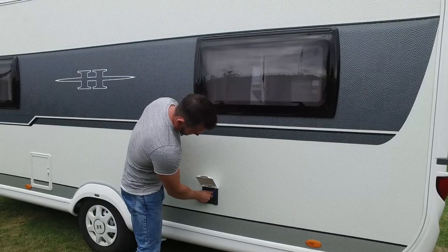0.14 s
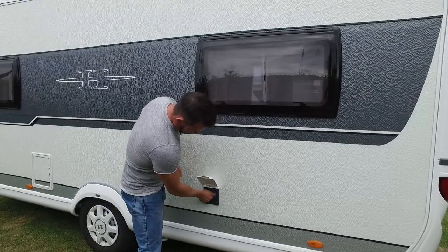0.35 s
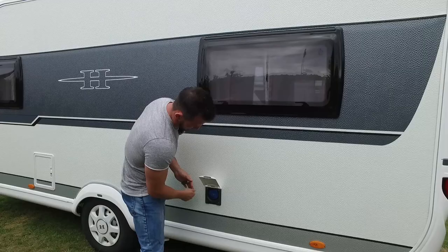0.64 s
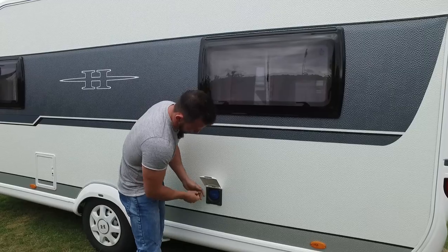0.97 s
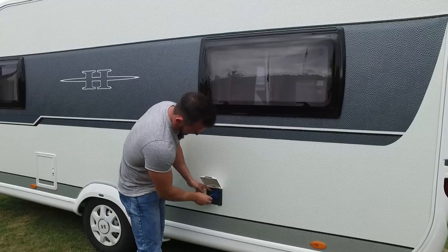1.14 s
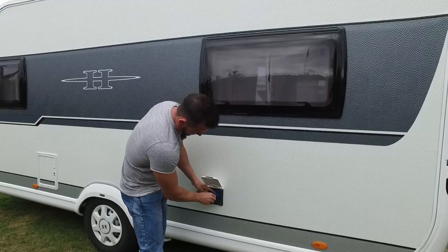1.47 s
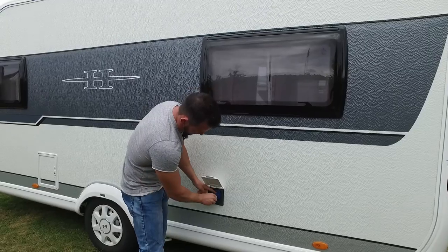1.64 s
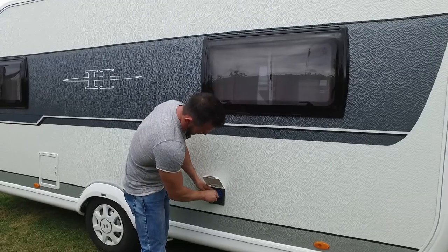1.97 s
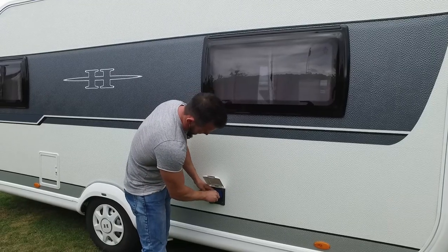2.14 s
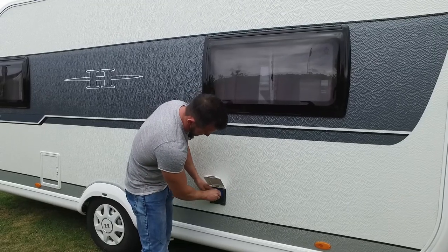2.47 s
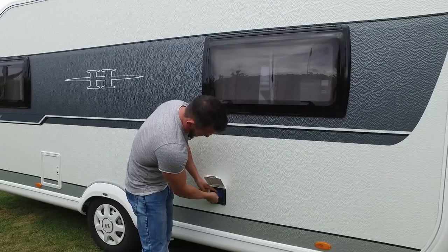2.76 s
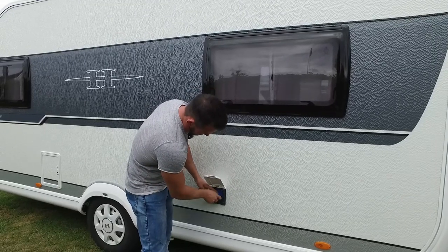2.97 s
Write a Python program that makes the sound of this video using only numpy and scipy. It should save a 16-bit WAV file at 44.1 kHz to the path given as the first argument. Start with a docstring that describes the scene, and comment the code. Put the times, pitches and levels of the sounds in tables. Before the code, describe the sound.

A plastic filler cap clicks and knocks in a hollow caravan wall. A key scrapes out of its lock first, then the cap rubs, turns and snaps into place. Faint air rumbles outdoors underneath.

```python
"""A plastic filler cap in a caravan wall is gripped, turned and seated, outdoors on quiet grass.
Each contact clicks in the plastic and thumps the hollow wall; the cap rubs and its catch snaps home.
Short, gritty scrapes come first from the key leaving the lock, later from the cap as it turns and seats.
The key squeaks once and its ring ticks now and then. The wall flexes under the hand,
light air rumbles underneath, and a faint far tone enters at the end."""
import sys
import numpy as np
from scipy import signal
from scipy.fft import rfft, irfft
from scipy.io import wavfile

SR = 44100
rng = np.random.default_rng(int(sys.argv[2]) if len(sys.argv) > 2 else 0)


def to_wav(sig):
    """Store sig (one row per channel, or 1-D mono) as 16-bit WAV at the path in sys.argv[1].

    Samples outside -1..1 are clipped; the rate is SR.
    """
    pcm = np.clip(np.atleast_2d(sig), -1, 1) * 32767
    pcm = np.round(pcm).astype(np.int16)
    wavfile.write(sys.argv[1], SR, pcm.T)  # frames by channels


N = 136710

# modes (natural tones) of wall, housing and cap: f/Hz, relative level/dB, t60/s (time to fade by 60 dB)
CAP_MODES = [(155.5, -15, 0.025), (199.2, 2.5, 0.0297), (244.2, 4.5, 0.069), (293.2, 5, 0.042),
             (352.4, 8, 0.028), (460.7, -7.5, 0.083), (550, -6.5, 0.12), (687, -7, 0.069),
             (937, -13.5, 0.038), (1100, 4, 0.014), (1326, -4.5, 0.03), (1560, -41, 0.0018),
             (2262, -9, .024), (2446, -0.5, 0.0071), (3280, 4, 0.0038), (3540, 1.5, 0.0033),
             (3720, -17.5, 0.0023), (4500, -10, 0.0052), (5050, -26, 0.0042), (6750, 0, 0.0051),
             (7530, 5, 0.0013), (9000, 12.5, 0.0015), (10430, 7.5, 0.0015), (12700, 2, 0.0016)]
# centres of five pitch ranges, called thump, knock, clack, click and tick: f/Hz
RANGES_HZ = [220, 480, 1350, 4000, 10000]


def cap_contacts():
    """The cap bumps its housing, and each bump sets the modes ringing in a different balance."""
    # t/s, then relative level/dB of thump, knock, clack, click and tick
    contacts = [ (0.105, -50, -42, -51, -46, -69), (0.219, -37, -28, -68, -54, -67),
                (0.316, -30.5, -44, -63, -61, -60), (0.347, -30, -22, -41.5, -44, -50),
                (0.5517, -30, -22, -36.5, -44.5, -55), (0.598, -28.5, -56, -45.5, -56.5, -65),
                (0.614, -65, -24, -45, -53, -62), (0.6327, -24.5, -6, -22.5, -18, -50.5),
                (0.825, -90, -46, -52.5, -99, -64), (1.3792, -38, -22, -30, -31.5, -47.5),
                (1.446, -39.5, -44.5, -85, -65, -66), (1.4536, -33.5, -90, -31.5, -69, -72),
                (1.464, -44, -35, -40, -48, -60), (1.541, -38.5, -71, -41.5, -69, -70.5),
                (1.563, -36, -26, -41.5, -63, -68.5), (1.617, -23.5, -22.5, -35, -32.5, -55.5),
                (1.874, -36, -58, -51.5, -57.5, -69), (1.881, -45.5, -33, -45, -70, -83),
                (1.943, -57, -64, -51, -68, -83), (2.017, -69, -66, -57, -50, -68.5),
                (2.087, -26.5, -49, -51, -59, -54), (2.098, -29, -69, -40.5, -34, -61.5),
                (2.1028, -28.5, -42, -26, -41.5, -58), (2.122, -28.5, -41, -32.5, -58, -79),
                (2.217, -46, -51.5, -47, -55, -72), (2.3387, -21.5, -26.5, -31.5, -28, -46.5),
                (2.350, -38.5, -17.5, -30, -39, -50), (2.369, -27, -57, -31.5, -59, -59),
                (2.418, -28.5, -35.5, -28, -56, -48.5), (2.437, -45.5, -26, -54, -44, -76),
                (2.444, -27.5, -45, -36.5, -45.5, -59), (2.5378, -17, -26, -25.5, -47, -35.5),
                (2.571, -28, -57, -31, -66, -48), (2.5879, -14, -52, -31, -26.5, -42),
                (2.746, -32.5, -68, -51, -54.5, -65), (2.7723, -38, -35.5, -38, -61, -75),
                (2.777, -43, -82, -39.5, -52, -67), (2.7959, -34.5, -28, -31, -55, -78),
                (2.814, -57, -15.5, -39, -75, -52), (2.818, -36, -29.5, -27.5, -63, -63.5),
                (3.061, -52.5, -32, -47.5, -45, -66)]
    out = np.zeros(N)
    for start, *levels in contacts:
        add(out, start, strike(CAP_MODES, mode_levels(levels) - 0.5))
    return out


def mode_levels(range_db):
    """Spreads five levels, one for each pitch range, smoothly over the cap's modes."""
    hz = np.array(CAP_MODES)[:, :1]
    return np.interp(np.log(hz), np.log(RANGES_HZ), range_db)


def strike(modes, gain_db):
    """One contact: low modes ring from a single push, high ones from a crunch of tiny slips after it."""
    t = np.arange(SR // 8) / SR
    hz, db, t60 = np.transpose(modes)[:, :, None]
    high = hz[:, 0] > 1900
    t60 = np.minimum(t60, 0.032 * np.sqrt(1000 / hz))  # the hand cuts long rings short
    level_luck, pitch_luck = rng.standard_normal((2, len(hz), 1))
    detune = np.where(high, 0.05, 0.012)[:, None] * pitch_luck  # high modes vary most with the spot hit
    rings = from_db(db + gain_db + 1.5 * level_luck) * ring(hz * (1 + detune), t60, t)
    lag_s, fade_s = 0.00027, 0.0012
    late = np.maximum(t - lag_s, 0)
    crunch = slips(per_s=12000, size=len(t)) * late * np.exp(-late / fade_s)
    crunch = from_db(-1) * rms_one(crunch) / np.sqrt(len(t))
    click = signal.fftconvolve(rings[high].sum(axis=0), crunch)[:len(t)]
    return rings[~high].sum(axis=0) + click


def ring(hz, t60, t):
    """A mode is pushed inwards, builds up within a cycle and dies away."""
    rise = 1 - np.exp(-(t * hz / 0.47) ** 2)
    return -rise * np.exp(-np.log(1000) * t / t60) * np.sin(2 * np.pi * hz * t)


def contact_notes():
    """Some bumps and the catch's snap also ring briefly at pitches of their own."""
    # t/s, f/Hz, level/dB, t60/s
    notes = [(0.2034, 1020, -22.5, 0.013), (0.3485, 579, -25.5, 0.073), (0.553, 764, -25.5, 0.028),
             (0.6335, 385, -14, 0.025), (0.6357, 1117, -13, 0.015), (1.3798, 2360, -26, 0.0092),
             (1.3796, 1550, -33.5, 0.029), (1.38, 480, -33.5, 0.026), (1.62, 3140, -30.5, 0.0058),
             (2.594, 2114, -44, .11), (2.818, 518, -31, 0.087)]
    out, t = np.zeros(N), np.arange(SR // 8) / SR
    for start, hz, db, t60 in notes:
        add(out, start, from_db(db) * ring(hz, t60, t))
    return out


def cap_rub():
    """The turning cap sticks and slips in its seat, shaking its modes into a dull, gritty sound."""
    # t/s, length/s, level/dB
    rubs = [(1.43, 0.031, -54), (1.534, 0.043, -54), (2.084, 0.052, -44.5), (2.407, 0.038, -46.5),
            (2.718, 0.14, -49.5)]
    # one value for each pitch range: relative level/dB
    balance = [-4.5, -3, -4, -17, -30]
    pressure = sum(from_db(db) * envelope(start, length, attack_s=0.0037, release_s=0.0027)
                   for start, length, db in rubs)
    body = strike(CAP_MODES, mode_levels(balance))
    friction = pressure * rms_one(slips(per_s=2500, size=N))
    return signal.fftconvolve(friction, body / np.linalg.norm(body))[:N]


def cap_catch():
    """The cap's springy catch snaps home, hard and bright, and rattles."""
    # t/s, relative level/dB
    snaps = [(2.5407, -28.5), (2.5933, -20), (2.614, -64)]
    # modes of the catch: f/Hz, relative level/dB, t60/s before the hand damps them
    catch_modes = [(962, -15.5, 0.02), (1133, -5.5, 0.035), (1370, 5.5, 0.018), (1590, -7.5, 0.061),
                   (2290, -3.5, 0.0047), (3680, 1.5, 0.0057), (4020, -3.5, 0.0059), (4700, -0.5, 0.0058),
                   (5400, -14, 0.0092), (8560, -8, 0.00307), (9400, -12, 0.0051)]
    out = np.zeros(N)
    for start, db in snaps:
        add(out, start, strike(catch_modes, db))
    return out


def scrapes():
    """Tiny slips make gritty, ringing scrapes: the key leaves the lock, later the cap turns and seats."""
    # t/s, length/s, level/dB, treble boost/dB, pitch factor
    strokes = [(0.06, 0.0074, -52.5, -29, 0.97), (0.079, 0.0093, -49, -27, 0.88),
               (0.092, 0.0034, -45, 0.5, 0.99), (0.194, 0.015, -43, 7.5, 0.91),
               (0.2105, 0.0048, -43, 6, 1.2), (0.217, 0.16, -66.5, 7, 1), (0.25, 0.0049, -49.5, 6, 0.75),
               (0.2537, 0.0034, -32, -10, 1.06), (0.3003, 0.0065, -36, 6.5, 1.155),
               (0.307, 0.0063, -49, 16.5, 1.01), (0.3253, 0.0033, -44, -7, 1.1),
               (0.3413, 0.0087, -34.5, -5, 1.002), (0.38, 0.016, -74.5, 25, 0.95),
               (2.085, 0.0217, -77, 20.5, 1.13), (2.339, 0.0078, -47, -1.5, 1.24),
               (2.347, 0.022, -57, -11, 0.71), (2.413, 0.0076, -51.5, -14, 0.8),
               (2.537, 0.038, -54.5, -2, 1.04), (2.602, 0.031, -56, -13, 1.39),
               (2.811, 0.015, -52, -4, 0.9)]
    # resonances that the slips set ringing: base f/Hz, width/Hz, relative level/dB
    resonances = [(1030, 570, -4.5), (1604, 200, 4.5), (3070, 490, -4), (3790, 460, -1.5), (4000, 200, 2),
                  (4410, 170, -5.5), (5960, 350, -8), (7070, 850, -19.5), (9800, 4700, -21),
                  (11400, 780, -22), (12700, 1800, -30)]
    out, size = np.zeros(N), SR // 4
    lowpass = signal.butter(2, 7100, fs=SR, output="sos")
    for start, length, db, treble_db, pitch in strokes:
        grains = slips(per_s=10000, size=size)
        treble = grains - signal.sosfiltfilt(lowpass, grains)
        pressure = from_db(db) * envelope(0, length, attack_s=0.0002, release_s=0.0012)[:size]
        drive = pressure * (grains + (from_db(treble_db) - 1) * treble)
        # the plain grains ring too, only to set the scale; neighbouring resonances have opposite signs
        pair = np.array([drive, grains])
        sound, steady = sum((-1) ** k * from_db(mode_db) * resonate(pair, hz * pitch, width)
                            for k, (hz, width, mode_db) in enumerate(resonances))
        add(out, start, sound / steady.std())
    return out


def key_squeak():
    """On the way out, friction keeps a few narrow resonances of the key singing for a moment."""
    # f/Hz, width/Hz, relative level/dB
    resonances = [(606, 70, -6.5), (1010, 93, -13), (1530, 200, -4.5), (1960, 98, -11), (3000, 160, -10),
                  (3410, 200, -5), (3840, 60, -11), (4680, 110, -6.5), (5660, 150, -5), (11760, 110, -12.5)]
    friction = rng.standard_normal(N)
    song = sum(from_db(db) * rms_one(resonate(resonate(friction, hz, width), hz, 2 * width))
               for hz, width, db in resonances)
    return from_db(-42.5) * envelope(start=0.255, length=0.023, attack_s=0.003, release_s=0.004) * song


def key_ring():
    """The dangling key ring makes thin, bright ticks that do not shake the wall."""
    # t/s, relative level/dB
    ticks = [(0.758, -53), (1.738, -48), (2.207, -53), (2.334, -55), (2.372, -54), (2.852, -51),
             (2.8593, -42)]
    out, t = np.zeros(N), np.arange(SR // 20) / SR
    fade = np.exp(-t / 0.00025)
    for start, db in ticks:
        add(out, start, from_db(db + 5) * rng.standard_normal(len(t)) * fade)
    return butter(out, [2620, 12800], "band")


def wall_ring(sound):
    """The hollow wall rings on briefly after each sound, longest in the bass."""
    # strength of the ring: f/Hz, level/dB
    levels = [(80, -16.5), (230, -10), (500, -10.5), (1200, -14), (2200, -15), (3600, -23.5), (6000, -16),
              (12000, -11)]
    # length of the ring: f/Hz, t60/s
    fade_times = [(150, .18), (240, .15), (350, .11), (2000, .12), (5000, .1), (12000, .07)]
    t, response = np.arange(SR // 2) / SR, 0
    rise = np.minimum(t / 0.011, 1)
    borders_hz = np.geomspace(50, 16000, 15)
    for low, high in zip(borders_hz, borders_hz[1:]):
        hz = np.sqrt(low * high)
        fade = np.exp(-np.log(1000) * t / at_hz(fade_times, hz))
        band = butter(rng.standard_normal(len(t)) * rise * fade, [low, high], "band")
        band *= np.sqrt(2 * (high - low) / SR / np.sum(band ** 2))  # gain of about 1 inside the band
        response = response + band * from_db(at_hz(levels, hz))
    return signal.fftconvolve(sound, response)[:N]


def wall_flex():
    """The wall panel rumbles as the hand pushes and pulls it."""
    # t/s, length/s, level/dB
    pushes = [(0.194, 0.15, -33.5), (2.532, 0.059, -32), (2.683, 0.32, -52)]
    # the rumble before its top is filtered off: f/Hz, relative level/dB
    spectrum = [(20, -13), (48, -5), (80, -1.5), (120, -13.5), (300, -18.5), (1000, -27)]
    effort = sum(from_db(db) * envelope(start, length, attack_s=0.0044, release_s=0.063)
                 for start, length, db in pushes)
    top_hz = 407
    return effort * butter(butter(coloured(spectrum), top_hz, "low"), top_hz, "low")


def outdoors():
    """Light air rumbles and wavers softly; a faint far tone fades in near the end."""
    # outdoor air: f/Hz, relative level/dB
    spectrum = [(20, 2), (45, -3.5), (80, -6), (130, -12.5), (250, -22), (600, -24), (1200, -31),
                (2500, -42), (5000, -48.5), (11000, -52.5), (15500, -52.5)]
    waver_db = rms_one(resonate(rng.standard_normal(N), hz=1, width_hz=0.51))
    tone = rng.standard_normal(N)
    for _ in range(2):
        tone = resonate(tone, hz=722, width_hz=24)
    fade_in = np.clip((np.arange(N) / SR - 2.92) / 0.05, 0, 1)
    air = from_db(-55.5 + waver_db) * coloured(spectrum)
    return air + from_db(-63) * fade_in * rms_one(tone)


def from_db(db):
    """Turns decibels into a plain multiplier."""
    return 10 ** (np.asarray(db) / 20)


def rms_one(x):
    """Scales a signal to an average strength (rms) of 1."""
    return x / np.sqrt(np.mean(x ** 2) + 1e-20)


def at_hz(points, hz):
    """Reads between the rows of a table, on a log-frequency axis."""
    points = np.array(points)
    return np.interp(np.log(hz), np.log(points[:, 0]), points[:, 1])


def butter(x, hz, kind):
    """A gentle filter that keeps the lows, the highs or one band."""
    return signal.sosfilt(signal.butter(2, hz, kind, fs=SR, output="sos"), x + 1e-18)


def resonate(x, hz, width_hz):
    """One resonance, with a gain of 1 at its peak."""
    r = np.exp(-np.pi * width_hz / SR)
    feedback = [1, -2 * r * np.cos(2 * np.pi * hz / SR), r * r]
    return signal.lfilter(np.array([1, 0, -1]) * (1 - r * r) / 2, feedback, x + 1e-18)


def coloured(spectrum):
    """Noise shaped by a spectrum, with the deepest bass removed and an rms of 1."""
    hz = np.maximum(np.arange(N // 2 + 1) * SR / N, 1)
    noise = irfft(rfft(rng.standard_normal(N)) * from_db(at_hz(spectrum, hz)), N)
    return rms_one(butter(noise, 22.7, "high"))


def envelope(start, length, attack_s, release_s):
    """Loudness over time: rises in a straight line, holds, then dies away."""
    t = np.arange(N) / SR - start
    return np.clip(t / attack_s, 0, 1) * np.exp(-np.maximum(t - length, 0) / release_s)


def slips(per_s, size):
    """Tiny jolts at random times, in either direction."""
    return (rng.random(size) < per_s / SR) * rng.standard_normal(size)


def add(out, start, sound):
    """Mixes a sound into out at a start time in seconds."""
    i = int(start * SR)
    out[i:i + len(sound)] += sound[:len(out) - i]


def scene():
    """Cap and key sound on the hollow wall, in the open air."""
    handling = cap_contacts() + contact_notes() + cap_rub() + cap_catch() + scrapes() + key_squeak()
    return (handling + wall_ring(handling) + key_ring() + wall_flex() + outdoors())[None]


def record(dry):
    """The microphone softens the treble, and the very top is cut steeply."""
    softened = butter(dry, 12250, "low")
    return signal.sosfilt(signal.ellip(10, 0.1, 80, 15600, fs=SR, output="sos"), softened)


dry = scene()
out = record(dry)
to_wav(out)
```